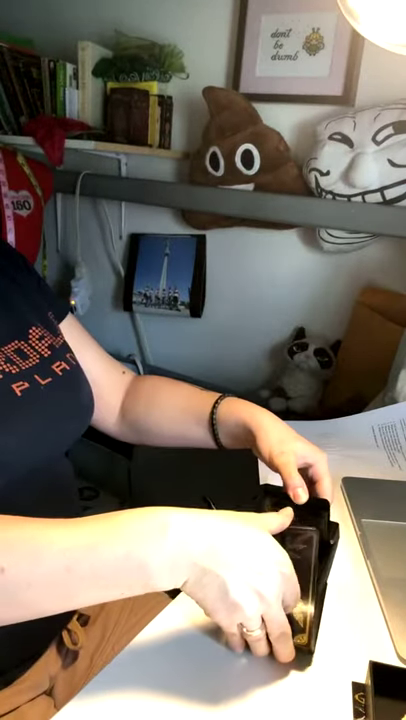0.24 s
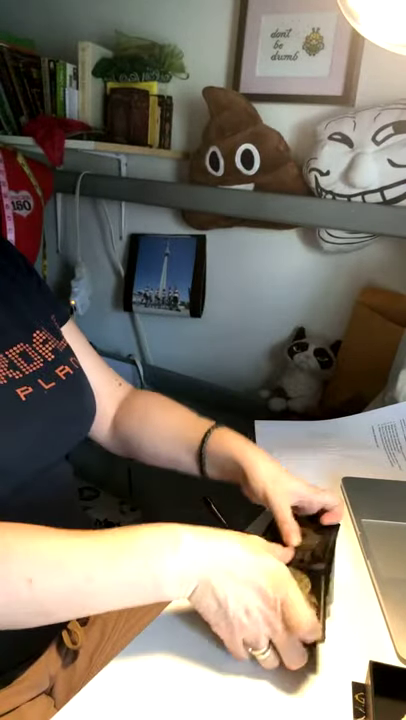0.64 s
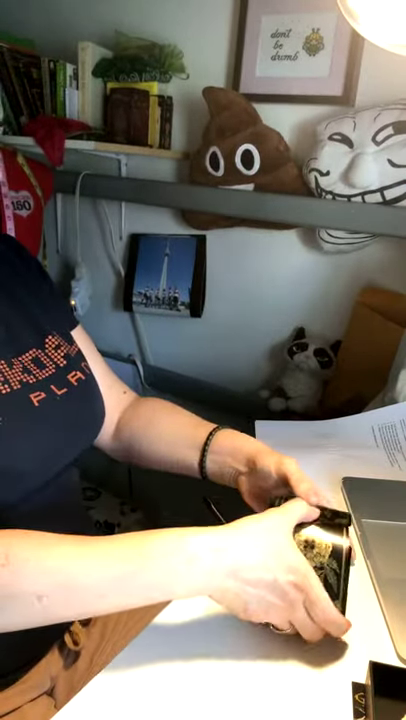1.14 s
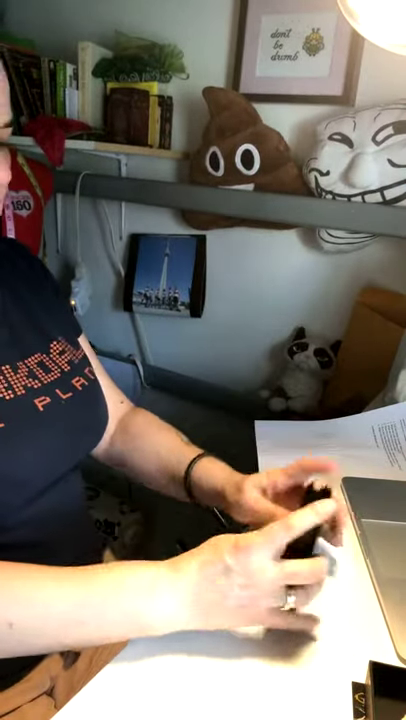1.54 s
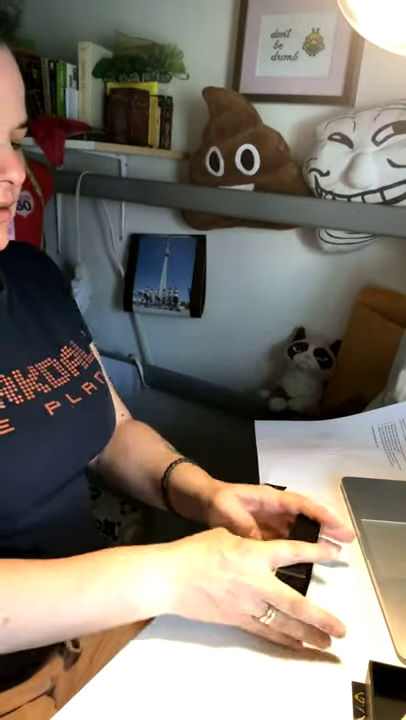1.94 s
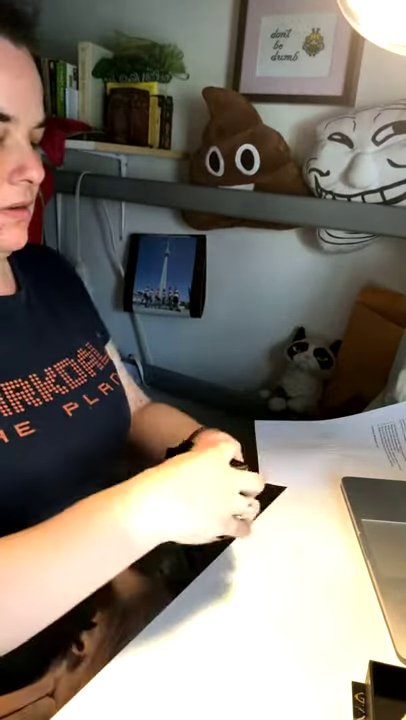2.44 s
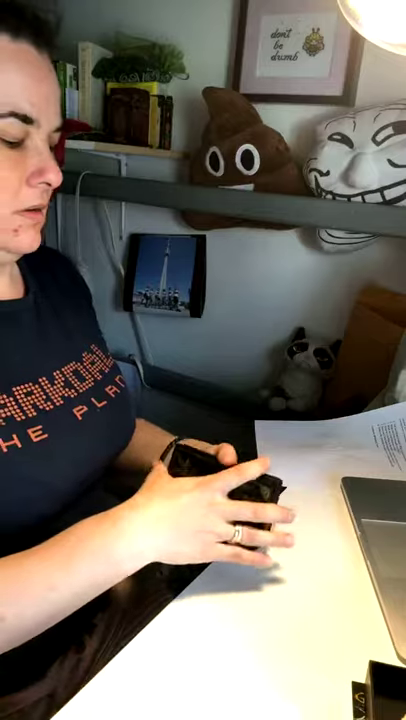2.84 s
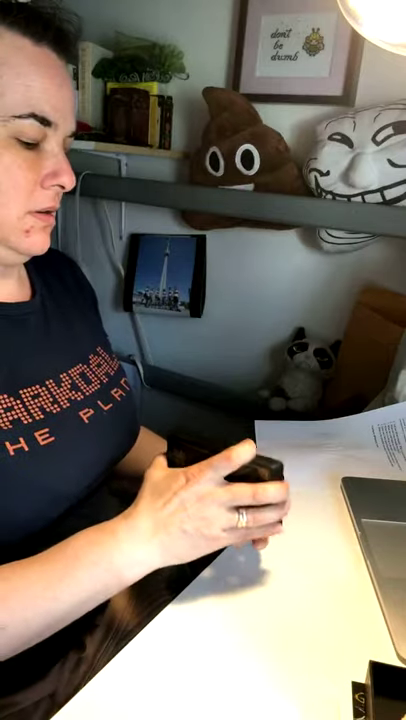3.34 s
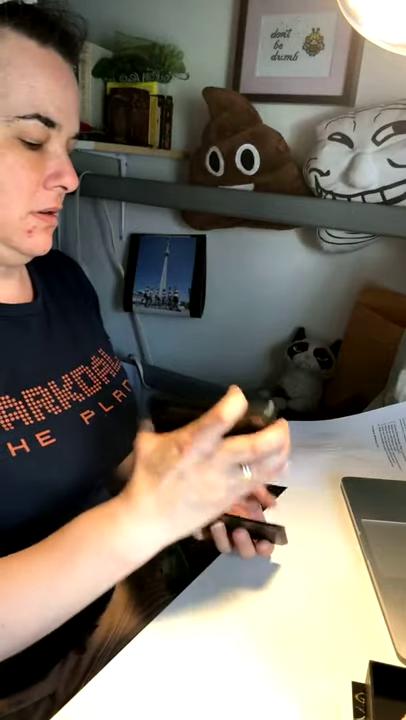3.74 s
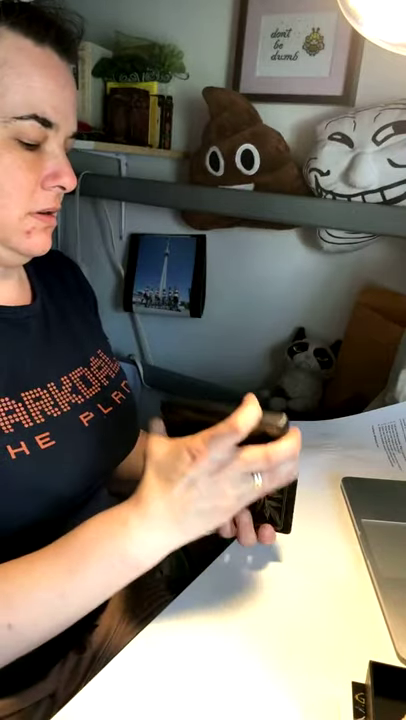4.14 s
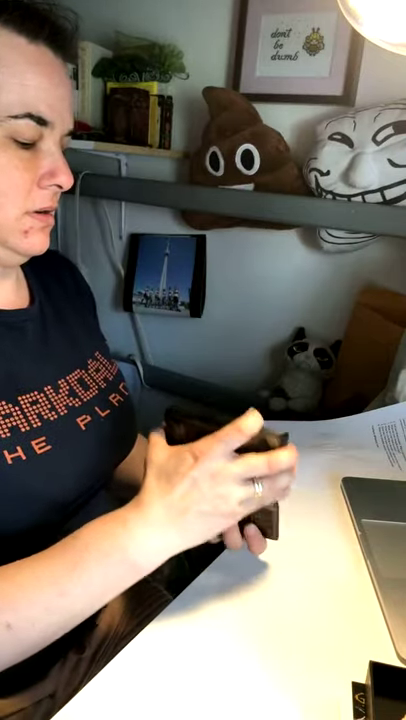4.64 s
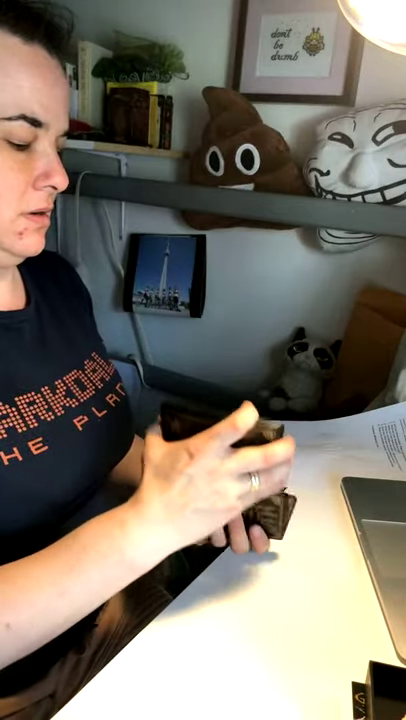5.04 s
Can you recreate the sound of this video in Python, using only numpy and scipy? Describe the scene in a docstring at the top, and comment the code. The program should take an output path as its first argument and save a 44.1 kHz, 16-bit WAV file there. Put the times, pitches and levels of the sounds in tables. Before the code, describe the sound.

A deck of big cards is riffled with crisp snapping edges, drops in a short rattle, then small packets brush and slap into a palm.

```python
"""Card edges snap as a deck of large cards is shuffled by hand at a desk in a small room: noise bursts, each
rung at its own pitch. The halves rub and slide together (juddering noise, random edge ticks), then the
deck clatters down in several drops of bunched bursts. It is squared; small packets brush off and slap into
the palm. Behind it the desk rumbles and booms under the hands, with low air noise and a faint wavering hum."""
import sys
import numpy as np
from scipy import signal
from scipy.fft import rfft, irfft
from scipy.io import wavfile
from scipy.ndimage import uniform_filter1d

SR = 44100
rng = np.random.default_rng(int(sys.argv[2]) if len(sys.argv) > 2 else 0)


def unload_audio(sound):
    """Save the sound as a 16-bit wav file, at the path given as the first command line argument."""
    columns = np.transpose(np.atleast_2d(sound))
    # keep every value between -1 and 1, then stretch to whole-number steps
    steps = np.round(np.clip(columns, -1, 1) * 32767)
    wavfile.write(sys.argv[1], SR, steps.astype(np.int16))


N = 232746
TIME = np.arange(N) / SR  # s

# event levels are dry: ahead of room and microphone
# resonances of the deck: (frequency [Hz], undamped width [Hz], relative level [dB])
DECK_MODES = [(1520, 33, 0.5), (1860, 93, -1.5), (2298, 34, -6), (2504, 13, -1.5), (2770, 20, -4),
              (3190, 55, -4), (3740, 25, -6.5), (4060, 40, -5.5), (4250, 73, -9.5)]
# resonances of cards and palm: (frequency [Hz], undamped width [Hz], relative level [dB])
PALM_MODES = [(337, 60, -3.5), (554, 44, -2), (1080, 68, 0.5), (1810, 120, -3.5), (2380, 180, -9),
              (2750, 310, -20), (3154, 120, -17), (4120, 290, -5)]
# spectrum of snapping edges: (frequency [Hz], relative density [dB])
SNAP_COLOUR = [(120, -52), (200, -21), (350, -12), (600, -14.5), (1650, -7.5), (2300, -3.5), (3200, -6.5),
               (4000, -11.5), (5500, -16.5), (8900, -25), (14000, -33.5), (16000, -30.5)]
# spectrum of slapping packets: (frequency [Hz], relative density [dB])
SLAP_COLOUR = [(120, -38), (200, -8.5), (560, -5.5), (930, -11), (1500, -4), (2300, -7.5), (3000, -8),
               (5000, -7.5), (9400, -13), (13600, -19.5), (16000, -28)]
# spectrum of sliding faces: (frequency [Hz], relative density [dB])
SLIDE_COLOUR = [(120, -51), (200, -13.5), (373, -8.5), (647, -11.5), (899, -13.5), (986, -18), (1230, -8.5),
                (1530, -14), (1810, -9.5), (2610, -6.5), (4860, -13), (8740, -17), (10500, -15),
                (13600, -20.5), (16000, -31.5)]


def snaps():
    """Stiff card edges spring free."""
    # edges flicking free: (time [s], level [dB], knock re middle [dB], crack re middle [dB],
    # ring [Hz], contact [s])
    snap_events = [(0.017, -34, -14, 20, 3000, 0.0024), (0.0565, -33, 6, -20, 2050, 0.00043),
                   (0.072, -36, -23, -24, 3210, 0.002), (0.1277, -23.5, -7, 0.5, 2800, 0.0043),
                   (0.1708, -31, 1, -12, 2370, 0.0015), (0.1987, -28, 14, -2, 2100, 0.00085),
                   (0.2208, -20, -21, -4.5, 3250, 0.0047), (0.2515, -33, -9, 14, 2400, 0.0015),
                   (0.2915, -30.5, 2, -22, 1860, 0.001), (0.2968, -21.5, 3, 28, 3340, 0.0056),
                   (0.3190, -14.5, -20, -10, 3150, 0.0068), (0.3385, -14, -12.5, -7.5, 3190, 0.0044),
                   (0.3768, -12, -19, -10, 3470, 0.003), (1.0482, -18, -7.5, -10, 2680, 0.0017),
                   (1.1238, -24, -4, -11, 2510, 0.003), (1.15, -23, -14, -20, 2770, 0.0043),
                   (1.174, -31.5, -17, -22, 1930, 0.0033), (1.1895, -26, -27, -17, 2020, 0.0067),
                   (1.2435, -27, -7, -7, 2880, 0.0023), (1.7125, -20.5, -12.5, -7, 3000, 0.0035),
                   (3.332, -60, -19.5, -15.5, 2370, 0.005), (4.65, -44.5, -12, -7.5, 2506, 0.0032),
                   (4.792, -59.5, -13.5, -12, 2250, 0.0044)]
    # resonances of a card: (frequency [Hz], undamped width [Hz], relative level [dB])
    card_modes = [(1950, 85, 0), (2500, 150, 0), (2650, 120, -7.5), (3250, 140, -0.5), (3585, 55, 3),
                  (3800, 150, -6.5), (4556, 120, -10.5)]
    return flicks(snap_events, SNAP_COLOUR, card_modes, rise_s=0.00033, fade_s=0.001, tilt_db=-3.5,
                  modes_db=-10, damping_hz=60, width_hz=450, bend_db=2)


def parting():
    """The halves are pulled apart: faces rub coarsely and edges tick."""
    # rubbing level: (time [s], middle [dB], body [dB], hiss [dB])
    parting_curve = [(0.0, -44, -54, -44.5), (0.09, -48.5, -51.5, -59.5), (0.198, -42, -50, -46.5),
                     (0.278, -41, -45.5, -48.5), (0.406, -53, -58, -62.5), (0.5, -61, -62.5, -67)]
    gains = along(parting_curve)
    rubbing = slide(gains, SLIDE_COLOUR, grain_db=3.5, judder_db=4, modes_db=-12.5)
    ticking = riffle(gains[0], SLAP_COLOUR, per_s=220, spread_db=1, tick_s=0.0007, level_db=-6)
    return rubbing + ticking


def weaving():
    """The halves are shoved into each other: a bright hiss of faces with edges ticking past."""
    # shoves: (time [s], length [s], level [dB], body re level [dB], hiss re level [dB])
    shoves = [(1.0, 0.087, -36.5, -21, -1), (1.09, 0.092, -37.5, -25, -6.5), (1.215, 0.095, -38, -26, -0.5)]
    gains = strokes(shoves, attack_s=0.023, release_s=0.024)
    rubbing = slide(gains, SLIDE_COLOUR, grain_db=4, judder_db=2.5, modes_db=-13)
    ticking = riffle(gains[0], SNAP_COLOUR, per_s=150, spread_db=9, tick_s=0.00064, level_db=-6)
    return rubbing + ticking


def landings():
    """The cards fall onto the desk in several drops; within each drop, later bunches are weaker."""
    # edge-on drops: (time [s], level of first bunch [dB], knock re middle [dB], crack re middle [dB],
    # time for all cards to land [s])
    drops = [(1.596, -30.5, -11, -30.5, 0.004), (1.61, -28.5, -13, -18.5, 0.004),
             (1.617, -16.5, -10, -12, 0.04), (1.667, -31, -10.5, -12, 0.036),
             (1.722, -27.5, -12, -11.5, 0.015)]
    # spectrum of the clatter: (frequency [Hz], relative density [dB])
    landing_colour = [(120, -58), (200, -23.5), (316, -18.5), (353, -7), (538, -21.5), (735, -5.5),
                      (1300, -15), (1560, -3.5), (1710, -3.5), (2510, -4), (3760, -8), (4040, -7),
                      (5230, -15.5), (9400, -28), (16000, -46.5)]
    gap_s, contact_s, loss_db_per_s = 0.0107, 0.0074, 170
    bunches = []
    for s, db, knock_db, crack_db, length_s in drops:
        for late_s in uneven_steps(length_s, gap_s, jitter=0.1):
            bunches.append((s + late_s, db - loss_db_per_s * late_s, knock_db, crack_db, contact_s))
    return flurries(bunches, landing_colour, DECK_MODES, rise_s=0.0003, fade_s=0.005, tilt_db=0.8,
                    modes_db=-4, damping_hz=60)


def slaps():
    """Packets drop onto the cards in the palm."""
    # packets slapping onto the deck: (time [s], level [dB], knock re middle [dB], crack re middle [dB],
    # ring [Hz], contact [s])
    slap_events = [(0.677, -43, -2, -24, 1800, 0.0019), (1.329, -30, -3.5, -6, 2400, 0.00078),
                   (1.5255, -35.5, -14, -3.5, 2800.0, 0.0025), (2.394, -52, -7, -12.5, 1795, 0.0037),
                   (2.4655, -43, -4, 1, 2220, 0.0074), (2.5125, -51.5, -14, -9, 1940.0, 0.0032),
                   (2.583, -61, -6, -22, 1800.0, 0.0035), (3.59, -51.5, 1, -6.5, 2580.0, 0.0041),
                   (3.9485, -37, -19, -4.5, 2670.0, 0.0038), (3.986, -41, -10, -15, 2050, 0.0049),
                   (4.269, -27.5, -10, -21, 2615, 0.0041), (4.467, -57.5, -3.5, -6, 2920.0, 0.0045),
                   (4.9345, -40, -7.5, -5, 2375, 0.0018), (5.058, -52, -4.5, -19, 1370.0, 0.0038)]
    return flicks(slap_events, SLAP_COLOUR, PALM_MODES, rise_s=0.00028, fade_s=0.0027, tilt_db=-13,
                  modes_db=-3.5, damping_hz=80, width_hz=560, bend_db=6.5)


def brushes():
    """Packets are stripped off the deck."""
    # packets brushing off: (time [s], level [dB], knock re middle [dB], hiss re middle [dB], contact [s])
    brush_events = [(0.8545, -42, -31, -5, 0.0035), (2.403, -49.5, -20, -8, 0.0067),
                    (3.876, -39.5, -17, -5, 0.046), (4.272, -45.5, -20.5, 4.5, 0.018),
                    (4.911, -48.5, 3.5, 3.5, 0.008), (4.9185, -40.5, -8, -2.5, 0.016)]
    return flurries(brush_events, SLIDE_COLOUR, PALM_MODES, rise_s=0.00061, fade_s=0.0032, tilt_db=-4.5,
                    modes_db=-11, damping_hz=80)


def handling():
    """The cards are lined up, the deck is squared, and cards shift in the hands."""
    # light lining-up slides: (time [s], length [s], level [dB], body re level [dB], hiss re level [dB])
    nudges = [(0.545, 0.087, -56, -5.5, -7.5), (0.666, 0.012, -52, -10, 0), (0.7, 0.024, -55, -9, -18),
              (0.75, 0.1, -61.5, -7, -8), (0.87, 0.11, -53.5, -19, -5.5), (1.5, 0.066, -58.5, -5.5, -7)]
    # firm squaring strokes: (time [s], length [s], level [dB], body re level [dB], hiss re level [dB])
    squaring_strokes = [(1.88, 0.019, -48.5, -4, -8), (2.13, 0.032, -46.5, -10, -6)]
    # spectrum of squaring: (frequency [Hz], relative density [dB])
    squaring_colour = [(120, -26), (200, -8.5), (316, -6), (394, -3), (558, -17), (696, -5), (950, -8),
                       (1040, -3.5), (1370, -10.5), (1530, -7), (2020, -9), (2650, -7), (4950, -14.5),
                       (9400, -18), (16000, -31)]
    # cards shifting in the hands: (time [s], length [s], level [dB], body re level [dB], hiss re level [dB])
    rustles = [(2.42, 0.096, -68, 1, -12), (2.61, 0.05, -81, -1.5, 3.5), (3.38, 0.063, -71, -12.5, -5),
               (3.5, 0.045, -75, -7, 0), (3.83, 0.23, -74, 1.5, -8), (4.32, 0.076, -66.5, -11, -7.5),
               (4.6, 0.19, -72.5, -0.5, -8), (4.97, 0.06, -72.5, -5.5, -5)]

    nudge_gains = strokes(nudges, attack_s=0.011, release_s=0.02)
    nudging = slide(nudge_gains, SLIDE_COLOUR, grain_db=2, judder_db=2.5, modes_db=-5)
    square_gains = strokes(squaring_strokes, attack_s=0.016, release_s=0.031)
    squaring = slide(square_gains, squaring_colour, grain_db=3.5, judder_db=1.4, modes_db=-5.5)

    # the held deck never lies quite still
    hold_from_s, hold_db = 1.4, (-85, -80.5, -90)  # middle, body, hiss
    held = from_db(hold_db)[:, None] * (TIME > hold_from_s)
    shift_gains = np.hypot(held, strokes(rustles, attack_s=0.077, release_s=0.049))
    shifting = slide(shift_gains, SLIDE_COLOUR, grain_db=2.5, judder_db=2.5, modes_db=-8)
    return nudging + squaring + shifting


def flicks(table, spectrum, modes, rise_s, fade_s, tilt_db, modes_db, damping_hz, width_hz, bend_db):
    """Each flick rings the free part of a card at its own pitch and shakes the pack behind it."""
    out = np.zeros(N)
    for s, db, knock_db, crack_db, hz, contact_s in table:
        force = contact(contact_s, rise_s, fade_s, tilt_db)
        body, middle, top = pack(force, spectrum, modes, modes_db, damping_hz)
        bend = rms_one(resonate(middle, [(hz, width_hz, 0)]))
        ring = rms_one(middle + from_db(bend_db) * bend)
        flick = ring + from_db(knock_db) * body + from_db(crack_db) * top
        add(out, s, at_level(flick, db))
    return out


def flurries(table, spectrum, modes, rise_s, fade_s, tilt_db, modes_db, damping_hz):
    """Many cards touch in quick succession and blur into one short rasp."""
    out = np.zeros(N)
    for s, db, knock_db, crack_db, contact_s in table:
        force = contact(contact_s, rise_s, fade_s, tilt_db)
        body, middle, top = pack(force, spectrum, modes, modes_db, damping_hz)
        rasp = middle + from_db(knock_db) * body + from_db(crack_db) * top
        add(out, s, at_level(rasp, db))
    return out


def contact(contact_s, rise_s, fade_s, tilt_db, count=4096):
    """A burst of tiny slips while cards touch, dying quickly once they part."""
    t = np.arange(count) / SR
    pressure = from_db(tilt_db * np.minimum(t / contact_s, 1))
    rise = 1 - np.exp(-t / rise_s)
    fade = np.exp(-np.maximum(t - contact_s, 0) / fade_s)
    return rng.choice([-1., 1.], count) * pressure * rise * fade


def slide(gains, spectrum, grain_db, judder_db, modes_db):
    """Card faces rub: fibre grains that judder with stick and slip and excite the pack."""
    friction, weight, hiss = gains
    slips = grains(N, grain_db) * from_db(judder_db * drift(260))
    body, middle, top = pack(slips, spectrum, DECK_MODES, modes_db, damping_hz=120)
    return friction * middle + weight * body + hiss * top


def grains(count, grain_db):
    """Paper fibres catching and letting go: dense clicks of very uneven size."""
    size_db = grain_db * np.minimum(rng.exponential(1, count), 5)
    return rms_one(rng.standard_normal(count) * from_db(size_db))


def riffle(friction, spectrum, per_s, spread_db, tick_s, level_db):
    """Single card edges tick past each other at random moments, harder when the friction is high."""
    passing = (rng.random(N) < per_s / SR) * from_db(spread_db * rng.uniform(-1, 1, N))
    decay = np.exp(-1 / (tick_s * SR))
    envelope = signal.lfilter([1], [1, -decay], passing + 1e-18)
    force = envelope * rng.standard_normal(N)
    return from_db(level_db) * friction * rms_one(colour(force, spectrum))


def pack(force, spectrum, modes, modes_db, damping_hz):
    """A pack of cards radiates broadly, with a few resonances damped by the fingers."""
    broad = rms_one(colour(force, spectrum))
    ringing = rms_one(resonate(broad, modes, damping_hz))
    return registers(broad + from_db(modes_db) * ringing)


def registers(x):
    """Split into body, middle and top, each of unit rms; the middle is inverted for a smooth join."""
    body = rms_one(band(x, 200, 1100))
    middle = rms_one(band(x, 1200, 4800))
    top = rms_one(band(x, 5200, 17000))
    return body, -middle, top


def drag(judder_db, attack_s, release_s):
    """The heel of the hand sticks and slips on the desk top, which answers with a hollow murmur."""
    # drags: (time [s], length [s], level [dB])
    drags = [(1.88, 0.077, -52), (2.023, 0.006, -59)]
    # resonances of the murmur: (frequency [Hz], width [Hz], relative level [dB])
    drag_modes = [(366, 31, -2.5), (397, 22, 3), (560, 175, -4.5)]
    level = sum(from_db(db) * swell(s, length_s, attack_s, release_s) for s, length_s, db in drags)
    slips = band(rng.standard_normal(N), 250, 1010) * from_db(judder_db * drift(90))
    return level * rms_one(resonate(slips, drag_modes))


def desk(attack_s, release_s, count=16384):
    """The desk top rumbles under the hands and booms briefly when bumped."""
    # hands leaning and pushing: (time [s], length [s], level [dB])
    pushes = [(0.0, 0.092, -51.5), (0.168, 0.27, -42.5), (0.524, 0.11, -53.5), (0.688, 0.057, -44.5),
              (0.872, 0.46, -52.5), (1.054, 0.019, -45.5), (1.616, 0.15, -50.5), (1.88, 0.22, -59.5)]
    # spectrum of the rumble: (frequency [Hz], relative density [dB])
    rumble_colour = [(12, -30), (20, -2.5), (43, 0.5), (86, -1.5), (119, 1), (159, -4), (184, -21),
                     (231, -14), (260, -17), (340, -32.5), (570, -120)]
    # hands bumping the desk: (time [s], rms of loudest 4 ms [dB])
    bumps = [(0.089, -41), (0.346, -36), (0.585, -44.5), (0.682, -36), (1.625, -38.5), (1.701, -40)]
    # resonances of the desk: (frequency [Hz], width [Hz], relative level [dB])
    desk_modes = [(37, 16, -3), (60.4, 16, -10), (109, 16, 2), (148, 14, -10.5)]
    level = sum(from_db(db) * swell(s, length_s, attack_s, release_s) for s, length_s, db in pushes)
    out = level * rms_one(colour(rng.standard_normal(N), rumble_colour))
    boom = resonate(band(signal.unit_impulse(count), 25, 170), desk_modes)
    for s, db in bumps:
        add(out, s, at_level(boom, db))
    return out


def room(x, early_db, early_s, tail_db, count=22050):
    """Close reflections off desk and walls, then a short tail that decays at its own rate in each band."""
    # decay of the tail: (frequency [Hz], t60 [s])
    room_t60 = [(200, 0.1), (800, 0.14), (2800, 0.089), (7000, .2), (14000, 0.07)]
    # colour of the room's tail: (frequency [Hz], relative level [dB])
    room_colour = [(200, -2.5), (2300, 0), (2900, -2.5), (3300, -3), (3800, 2), (4500, 1), (16000, 0.5)]
    t = np.arange(count) / SR
    early = grains(count, 0.99) * np.exp(-t / early_s) * (t > 0.0015)
    tail = np.zeros(count)
    edges_hz = np.geomspace(100, 20000, 9)
    for low_hz, high_hz in zip(edges_hz, edges_hz[1:]):
        t60_s = at_hz(room_t60, np.sqrt(low_hz * high_hz))
        tail += band(rng.standard_normal(count), low_hz, high_hz) * from_db(-60 * t / t60_s)
    tail = colour(tail * (t > 0.005), room_colour)
    response = from_db(early_db) * rms_one(early) + from_db(tail_db) * rms_one(tail)
    return x + signal.fftconvolve(x, response / np.sqrt(count))[:N]


def room_tone():
    """Low air noise and a faint appliance hum of sines with wavering phase."""
    # spectrum of the air: (frequency [Hz], relative density [dB])
    air_colour = [(12, -30.5), (20, 0.5), (107, -8), (168, -15), (204, -9.5), (248, -22.5), (301, -20),
                  (328, -18.5), (459, -30), (660, -26), (738, -32), (949, -26), (1810, -31), (3630, -31.5),
                  (16000, -44)]
    # hum partials: (frequency [Hz], rms level [dB])
    hum_partials = [(102.3, -81.5), (199.2, -76), (226.1, -79), (301.5, -84)]
    air_db = -64.5  # rms
    settled = colour(rng.standard_normal(N + SR), air_colour)[SR:]
    out = from_db(air_db) * rms_one(settled)
    for hz, db in hum_partials:
        phase = 2 * np.pi * hz * TIME + 0.5 * drift(4)
        out += from_db(db) * np.sqrt(2) * np.sin(phase)
    return out


def swell(s, length_s, attack_s, release_s):
    """One movement of a hand: it builds up, holds and dies away."""
    before = np.maximum(s - TIME, 0) / attack_s
    after = np.maximum(TIME - s - length_s, 0) / release_s
    return np.exp(-np.minimum(before + after, 20))


def strokes(table, attack_s, release_s):
    """Gains of middle, body and hiss for a series of strokes, summed in power."""
    power = 0
    for s, length_s, db, body_db, hiss_db in table:
        peak = from_db([[db], [db + body_db], [db + hiss_db]])
        power = power + (peak * swell(s, length_s, attack_s, release_s)) ** 2
    return np.sqrt(power)


def along(curve):
    """Gains of middle, body and hiss along a level curve; practically silent outside it."""
    s, *levels = np.transpose(curve)
    return [from_db(np.interp(TIME, s, db, left=-140, right=-140)) for db in levels]


def uneven_steps(length_s, gap_s, jitter, count=16):
    """Moments from zero up to a length, at slightly uneven gaps."""
    gaps = gap_s * (1 + jitter * rng.uniform(-1, 1, count))
    moments = np.cumsum(gaps) - gaps
    return moments[moments < length_s]


def drift(per_s):
    """Slow random curve of unit rms, with per_s knots a second."""
    knots = rng.standard_normal(int(N / SR * per_s) + 2)
    return rms_one(np.interp(TIME * per_s, np.arange(len(knots)), knots))


def resonate(x, modes, damping_hz=0):
    """Parallel resonances of unit peak gain before their own level; damping widens them."""
    out = 0
    for hz, width_hz, db in modes:
        r = np.exp(-np.pi * (width_hz + damping_hz) / SR)
        poles = [1, -2 * r * np.cos(2 * np.pi * hz / SR), r * r]
        peak_gain = (1 - r * r) / 2
        out = out + from_db(db) * peak_gain * signal.lfilter([1, 0, -1], poles, x + 1e-18)
    return out


def colour(x, spectrum, size=8192):
    """Causal (minimum-phase) filter with the given spectrum."""
    gain = from_db(at_hz(spectrum, np.fft.rfftfreq(size, 1 / SR)))
    cepstrum = irfft(np.log(gain))
    # fold onto positive time
    cepstrum[1:size // 2] *= 2
    cepstrum[size // 2 + 1:] = 0
    response = irfft(np.exp(rfft(cepstrum)))
    return signal.fftconvolve(x, response)[:len(x)]


def band(x, low_hz, high_hz):
    """Butterworth band-pass."""
    sos = signal.butter(2, [low_hz, high_hz], "band", fs=SR, output="sos")
    return signal.sosfilt(sos, x)


def at_hz(points, hz):
    """Read a table on a log-frequency axis."""
    known_hz, values = np.transpose(points)
    return np.interp(np.log(np.maximum(hz, 1)), np.log(known_hz), values)


def from_db(db):
    """Decibels to gain."""
    return 10 ** (np.asarray(db) / 20)


def rms_one(x):
    """Scale to unit rms."""
    return x / np.sqrt(np.mean(x ** 2) + 1e-20)


def at_level(sound, db, size=176):
    """Set the rms of the loudest four milliseconds."""
    loudest = np.sqrt(uniform_filter1d(sound ** 2, size).max())
    return sound * from_db(db) / loudest


def add(track, s, sound):
    """Mix a sound in at a given time."""
    start = max(int(s * SR), 0)
    track[start:start + len(sound)] += sound[:N - start]


def scene():
    """Cards and hand drags sound in the room; desk rumble and room tone join without reverberation."""
    cards = snaps() + parting() + weaving() + landings() + slaps() + brushes() + handling()
    dragging = drag(judder_db=6, attack_s=0.012, release_s=0.022)
    heard = room(cards + dragging, early_db=-9, early_s=0.014, tail_db=-8)
    return (heard + desk(attack_s=0.014, release_s=0.022) + room_tone())[None]


def record(dry):
    """Microphone colour and a steep top cut."""
    # microphone response: (frequency [Hz], gain [dB])
    microphone = [(20, 2.5), (4200, -1), (5000, -3), (6200, -0.5), (9500, 2), (10400, -5), (11500, -3.5),
                  (14000, 4.5), (16000, -6)]
    cutoff_hz = 16200
    low_pass = signal.ellip(10, 0.1, 70, cutoff_hz, fs=SR, output="sos")
    return signal.sosfilt(low_pass, colour(dry[0], microphone))[None]


dry = scene()
out = record(dry)
unload_audio(out)
```